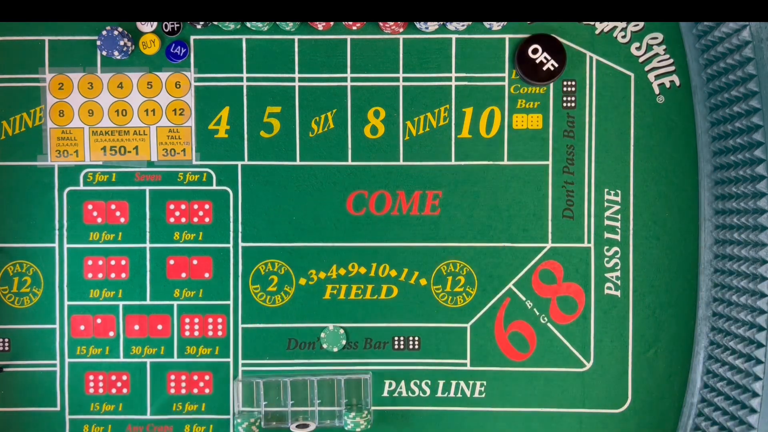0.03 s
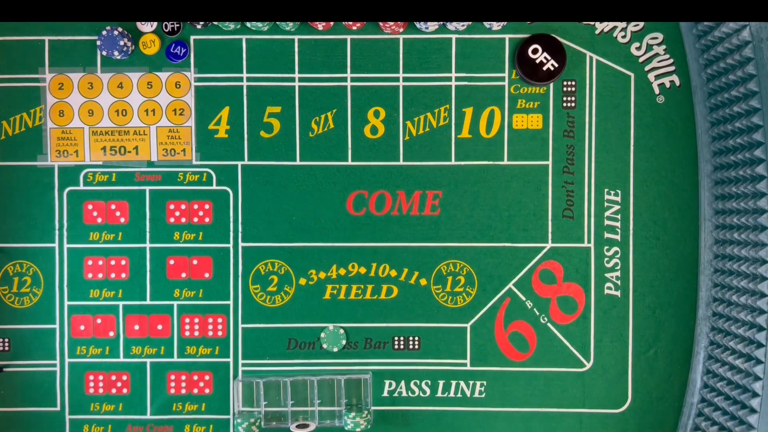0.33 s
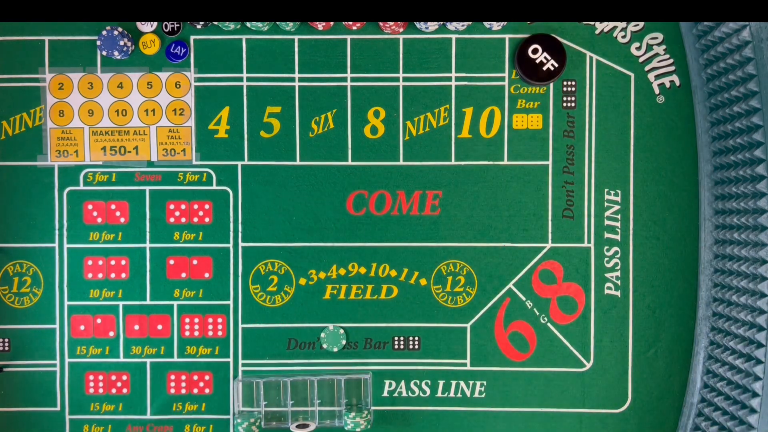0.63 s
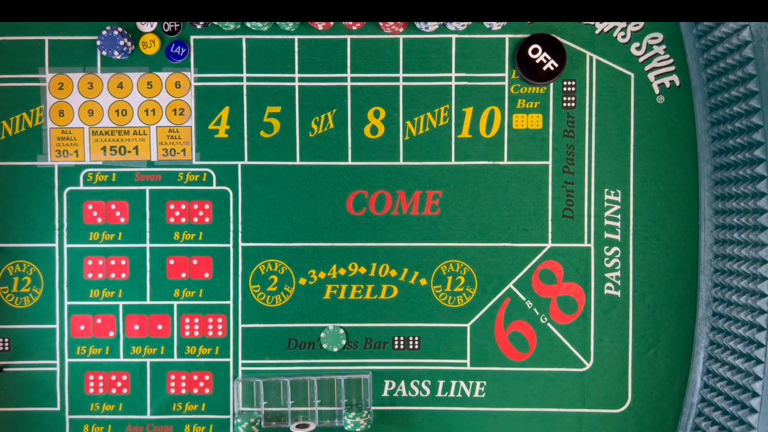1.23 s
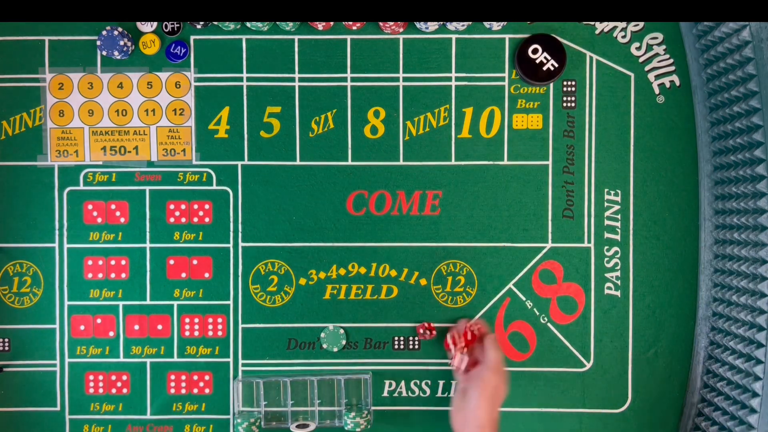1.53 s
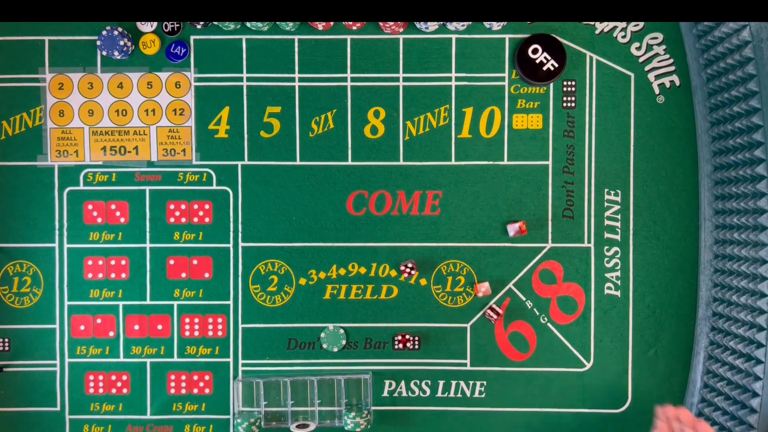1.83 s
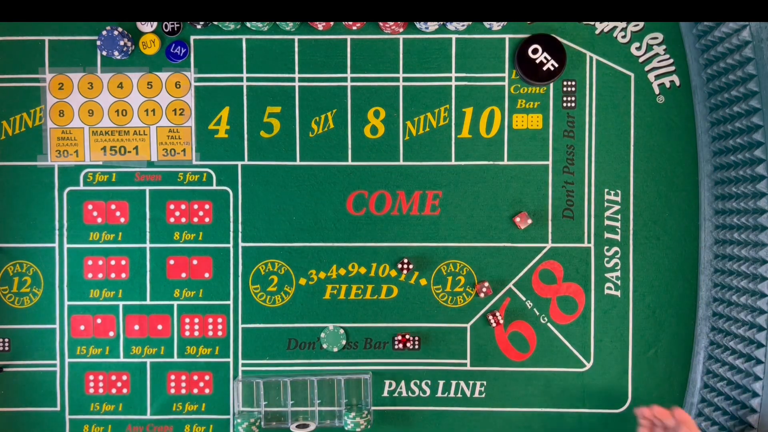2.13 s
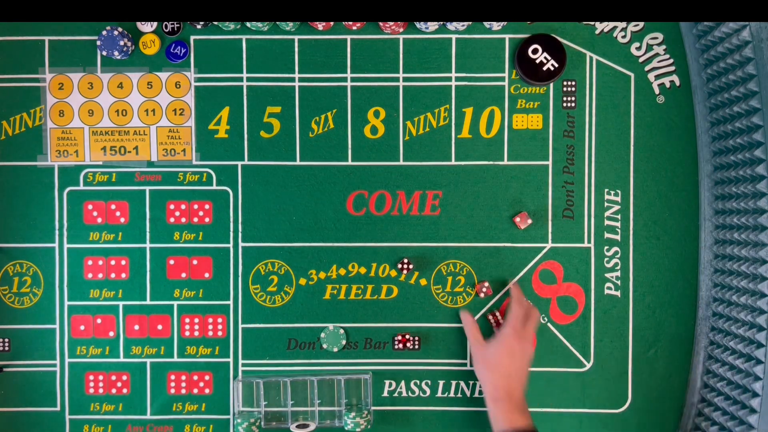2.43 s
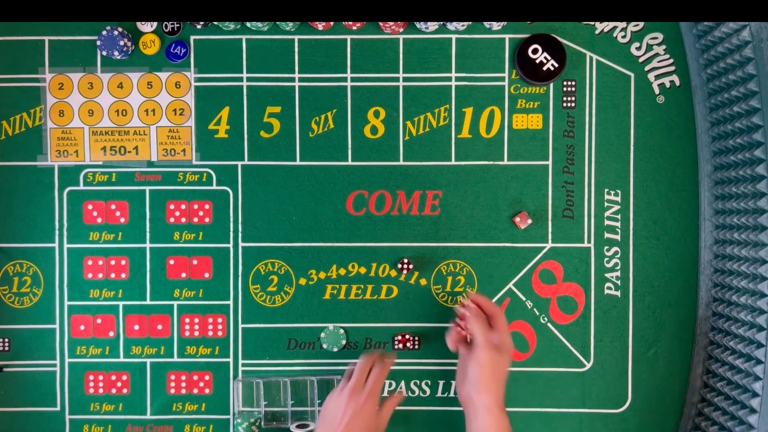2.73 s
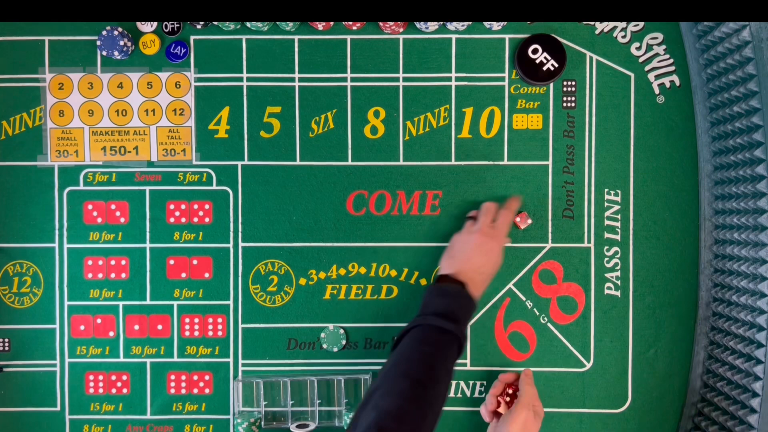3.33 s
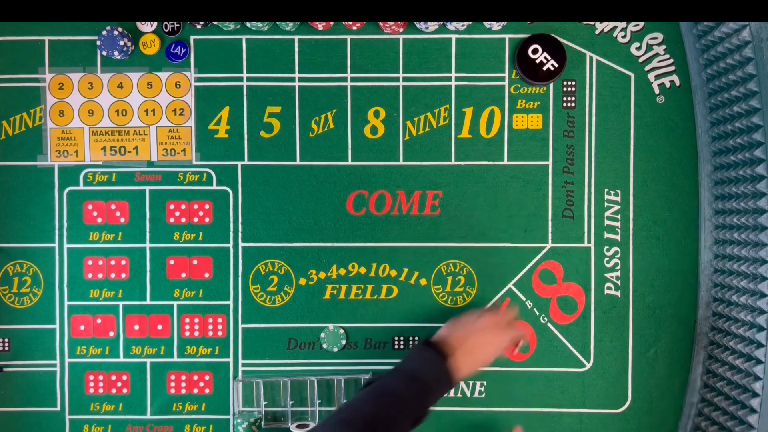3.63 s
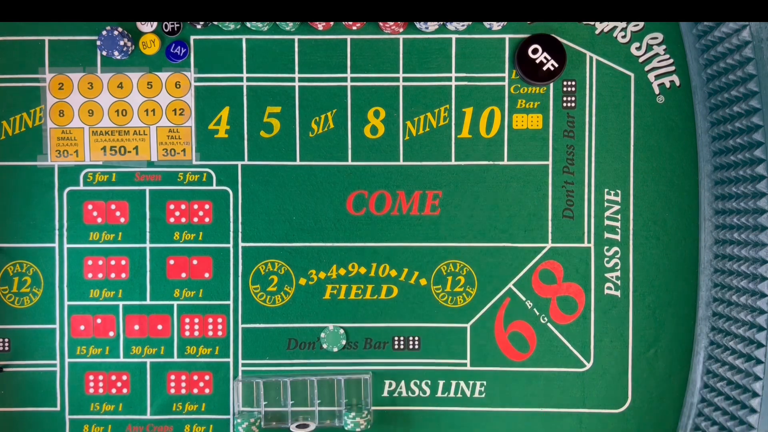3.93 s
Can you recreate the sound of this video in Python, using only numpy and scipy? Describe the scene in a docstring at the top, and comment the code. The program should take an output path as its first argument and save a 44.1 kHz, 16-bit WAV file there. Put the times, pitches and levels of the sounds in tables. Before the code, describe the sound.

Dice click together in a hand, land on a felt table and are gathered up.

```python
"""A gaming table in a small room that hums and hisses faintly.
Hard plastic dice click together in a hand, are tossed onto the felt and gathered up again.
Each click chatters, rings briefly and echoes off the table's walls. The dice land with dull
thuds that set the table top booming; a sleeve brushes the felt."""
import sys
import numpy as np
from scipy import signal
from scipy.fft import rfft, irfft
from scipy.io import wavfile

SR = 44100
rng = np.random.default_rng(int(sys.argv[2]) if len(sys.argv) > 2 else 0)


def wav_record(signal):
    """Record a signal, one row per channel, as 16-bit PCM in the file named by sys.argv[1]."""
    frames = np.transpose(np.atleast_2d(signal))
    bounded = np.clip(frames, -1, 1)
    # unit amplitude maps onto the largest positive 16-bit level
    quanta = np.round(bounded * 32767).astype(np.int16)
    wavfile.write(sys.argv[1], SR, quanta)


N = 176400


def amp(db):
    """Decibels to gain."""
    return 10 ** (np.asarray(db) / 20)


def unit_rms(x):
    return x / np.sqrt(np.mean(x ** 2) + 1e-20)


def at_hz(points, hz):
    """Interpolates a table over log frequency."""
    freqs, values = np.transpose(points)
    return np.interp(np.log(hz + 1), np.log(freqs), values)


def envelope(points):
    """A dB curve over time, as gain."""
    return amp(np.interp(np.arange(N) / SR, *np.transpose(points)))


def add(mix, start_s, sound):
    part = mix[..., max(round(start_s * SR), 0):][..., :sound.shape[-1]]
    part += sound[..., :part.shape[-1]]


def pan_left(db):
    return amp([[db], [-db]])


def sine(hz, t):
    return np.sin(2 * np.pi * hz * t)


def mode(hz, t60_s, t):
    """A struck mode dying away."""
    return sine(hz, t) * amp(-60 * t / t60_s)


def drift(limit_hz):
    """Random wander below limit_hz, rms 1."""
    passband = np.fft.rfftfreq(N, 1 / SR) < limit_hz
    return unit_rms(irfft(rfft(rng.standard_normal(N)) * passband, N))


def colour(x, spectrum, size=4096):
    """Minimum-phase filter with the given spectrum."""
    log_gain = np.log(amp(at_hz(spectrum, abs(np.fft.fftfreq(size, 1 / SR)))))
    taps = np.fft.ifft(np.exp(np.conj(signal.hilbert(log_gain)))).real[:size // 2]
    return signal.fftconvolve(np.atleast_2d(x), taps[None], axes=1)[:, :x.shape[-1]]


# Each row: frequency in Hz, left-right correlation.
STEREO_COHERENCE = [(130, 0.9), (500, 0.033)]

def noise(spectrum):
    """Stereo noise of rms 1, alike on both sides in the bass."""
    hz = np.fft.rfftfreq(N, 1 / SR)
    left, independent = rfft(rng.standard_normal((2, N)))
    coherence = np.clip(at_hz(STEREO_COHERENCE, hz), -1, 1)
    right = coherence * left + np.sqrt(1 - coherence ** 2) * independent
    return unit_rms(irfft(np.array([left, right]) * amp(at_hz(spectrum, hz)), N))


# Each row: frequency in Hz, reverberation time in seconds.
ROOM_T60 = [(3000, 0.24), (12000, 0.13)]

def room_tail(size=16384, rise_s=0.0034):
    """A fresh diffuse tail, thin in the bass and dying faster in the treble."""
    hz, t, bands = signal.stft(rng.standard_normal((2, size)), SR, nperseg=256)
    decay = amp(-60 * t / at_hz(ROOM_T60, hz)[:, None])
    bass_cut = (hz / (hz + 150))[:, None]
    tail = signal.istft(bands * decay * bass_cut, SR, nperseg=256)[1][:, :size]
    onset = np.minimum(np.arange(size) / SR / rise_s, 1)
    return unit_rms(tail * onset) / np.sqrt(size)


def in_room(sound, wet_db):
    """Direct sound plus room tail."""
    path = amp(wet_db) * room_tail()
    path[:, 0] += 1
    return signal.fftconvolve(np.atleast_2d(sound), path, axes=1)


# Each row: frequency in Hz, relative level in dB.
AIR_SPECTRUM = [(22, -46.5), (75, 4), (200, -8), (650, -6.5), (1300, -19), (10000, -55)]
HISS_SPECTRUM = [(3000, 6.5), (9300, -8), (11700, -1), (16000, -6.5)]
# Each row: time in seconds, level in dB.
HISS_LEVELS = [(1.5, -72), (2.3, -74), (2.45, -66)]
# Each row: frequency in Hz, level in dB.
HUM_PARTIALS = [(119.7, -58), (382, -70.5), (463, -69.5), (700, -74.5)]

def background(air_db=-57, waver=0.46):
    """Room noise, faint hiss and a hum that wavers in level and phase."""
    t, hum = np.arange(N) / SR, np.zeros(N)
    for hz, db in HUM_PARTIALS:
        gain = amp(db) * np.sqrt(2) * (1 + waver * drift(14))
        hum += gain * np.sin(2 * np.pi * hz * t + waver * drift(3.1))
    return amp(air_db) * noise(AIR_SPECTRUM) + envelope(HISS_LEVELS) * noise(HISS_SPECTRUM) + hum


def swish(peak_s=2.19, half_length_s=0.18, gain_db=-81, centre_hz=6270, half_width_hz=330):
    """A faint, narrow sliding swish swells and fades after the throw."""
    t = np.arange(N) / SR
    swell = np.exp(-np.square((t - peak_s) / half_length_s))
    return amp(gain_db) * swell * drift(half_width_hz) * sine(centre_hz, t)


# Each row: time in seconds, level in dB.
RUB_LEVELS = [(2.97, -58.5), (3.02, -37), (3.11, -56), (3.15, -47.5), (3.2, -62), (3.35, -98)]
# Each row: frequency in Hz, relative level in dB.
RUB_SPECTRUM = [(60, -20), (230, 5.5), (3000, -7.5), (9500, -21.5)]
FIZZ_SPECTRUM = [(6000, -14), (12500, -7)]

def sleeve(grain_db=1, fizz_db=-41, fizz_power=2.8):
    """Cloth catches and slips on the felt, and fizzes when pressed hardest."""
    t, rub = np.arange(N) / SR, envelope(RUB_LEVELS)
    touching = (t > RUB_LEVELS[0][0]) & (t < RUB_LEVELS[-1][0])
    grain = unit_rms(amp(grain_db * drift(440)))
    fizz = amp(fizz_db) * (rub / rub.max()) ** fizz_power * noise(FIZZ_SPECTRUM)
    return touching * grain * (rub * noise(RUB_SPECTRUM) + fizz)


# Each row: time in seconds, level in dB.
RUMBLE_LEVELS = [(1.4, -73), (1.8, -51), (2.4, -59.5), (2.9, -58.5), (3.35, -47.5), (4, -71)]
# Each row: frequency in Hz, relative level in dB.
RUMBLE_SPECTRUM = [(22, -31.5), (55, 7), (95, 5), (1500, -58.5)]
# Pushes that bend the top. Each row: start in seconds, level in dB, pitch in Hz.
PUSHES = [(1.543, -35, 93), (1.642, -32.5, 117.6), (2.543, -32.5, 112.7), (3.089, -36, 69),
          (3.374, -32, 93)]

def table_top(rise_s=0.005, t60_s=0.2):
    """The table top booms when pushed and rumbles under rolling dice and hands."""
    out, t = envelope(RUMBLE_LEVELS) * noise(RUMBLE_SPECTRUM), np.arange(SR) / SR
    onset = 1 - np.exp(-t / rise_s)
    for start_s, db, hz in PUSHES:
        add(out, start_s, amp(db) * mode(hz, t60_s, t) * onset)
    return out


# Each row: start in seconds, level in dB, pitch in Hz.
LANDINGS = [(1.5345, -31.5, 447), (1.546, -32, 278), (1.6338, -28, 419), (1.648, -30.5, 309),
            (1.660, -38.5, 480), (1.6744, -32, 382), (2.5405, -36, 375), (3.0608, -26, 411),
            (3.078, -25, 398), (3.093, -31, 403), (3.262, -41.5, 260)]
# Each row: frequency in Hz, relative level in dB.
PUFF_SPECTRUM = [(680, 0), (1250, -25.5), (9000, -37)]

def felt_thuds(size=4096, rise_s=0.00025, t60_s=0.043, puff_db=-9, puff_decay_s=0.0069):
    """Dice and fingers land on felt: a damped knock of the board and a soft puff."""
    out, t = np.zeros((2, N)), np.arange(size) / SR
    onset = 1 - np.exp(-t / rise_s)
    for start_s, db, hz in LANDINGS:
        soft_noise = unit_rms(colour(rng.standard_normal((2, size)), PUFF_SPECTRUM))
        puff = amp(puff_db) * soft_noise * np.exp(-t / puff_decay_s)
        thud = (mode(hz, t60_s, t) + puff) * onset
        add(out, start_s, amp(db) * in_room(thud, wet_db=-8))
    return out


# Each row: start in seconds, level per mode in dB, list of modes in Hz.
HARD_KNOCKS = [(0.999, -36.5, [2546, 6815, 7348, 7838, 8075]), (2.5425, -41, [2290, 2790, 2900])]

def dice_ring(size=8192, t60_s=0.068):
    """The hardest knocks set the dice ringing."""
    out, t = np.zeros((2, N)), np.arange(size) / SR
    for start_s, db, modes_hz in HARD_KNOCKS:
        ring = sum(mode(hz, t60_s, t) for hz in modes_hz)
        add(out, start_s, amp(db) * in_room(ring, wet_db=-7))
    return out


def wall_echoes(count=7, size=16384, decay_s=0.005):
    """A few quick echoes from the table's walls."""
    taps = np.zeros((2, size))
    for side in taps:
        delay_s = (np.arange(count) + rng.uniform(0.36, 1, count)) / count * 2 * decay_s
        side[(delay_s * SR).astype(int)] = rng.choice([-1, 1], count) * np.exp(-delay_s / decay_s)
    return unit_rms(taps) / np.sqrt(size)


# Each entry: a resonance of a die in Hz.
PLASTIC_MODES_HZ = [1480, 1794, 2300, 2800, 3257, 3538, 4045, 4450]
# Dice and cupped hand. Each row: frequency in Hz, relative gain in dB.
DICE_SPECTRUM = [(400, -32), (1050, -6.5), (2000, -2), (7500, 0), (10000, 2)]

def click(centre_hz, size=3072, chatter_db=-5, chatter_decay_s=0.00066, ring_db=-43.5, t60_s=0.073):
    """One hard contact: an impulse, brief chatter of the faces and a short plastic ring."""
    t, hz = np.arange(size) / SR, np.geomspace(100, SR / 2, 60)
    chatter = rng.standard_normal(size) * np.exp(-t / chatter_decay_s)
    ring = sum(rng.standard_normal() * mode(mode_hz, t60_s, t) for mode_hz in PLASTIC_MODES_HZ)
    hit = (t == 0) + amp(chatter_db) * chatter / np.linalg.norm(chatter) + amp(ring_db) * ring
    low_hz, high_hz = centre_hz / 1.374, centre_hz * 1.374
    lowpass = 1 / np.hypot(1, (hz / high_hz) ** 4.29)
    highpass = 1 / np.hypot(1, (low_hz / hz) ** 1.32)
    gain_db = 20 * np.log10(lowpass * highpass) + at_hz(DICE_SPECTRUM, hz)
    out = colour(hit, np.c_[hz, gain_db])
    return out / np.linalg.norm(out)


# Each row: start in seconds, length in seconds, relative level per contact in dB, centre in Hz.
PALM_RATTLES = [(.002, 0.015, -41, 2920), (1.328, 0.046, -49, 5100), (2.846, 0.026, -52, 3000),
                (3.432, .024, -41.5, 3500)]

def rattle_contacts(count=8):
    """Dice jostle in the palm: runs of light, unevenly spaced contacts."""
    return [(start_s + length_s * (k + jitter) / count, db, hz)
            for start_s, length_s, db, hz in PALM_RATTLES
            for k, jitter in enumerate(rng.random(count))]


# Sharper contacts reach higher. Each row: start in seconds, relative level in dB, centre in Hz.
DIE_CONTACTS = [(.0005, -26.5, 3030), (0.0557, -24.5, 2300), (0.0572, -23, 4400), (0.0603, -29, 2770),
                (.0853, -45, 3570), (0.2095, -40, 2150), (0.2545, -34, 2100), (0.276, -41, 2800),
                (0.3049, -43, 2820), (0.356, -33, 3170), (.502, -45, 2500), (.5385, -32, 2730),
                (.571, -36, 2540), (.843, -42.5, 3330), (0.9562, -38, 3600), (0.9805, -37, 2420),
                (.995, -26.5, 7000), (.9992, -27, 7500), (1.003, -27.5, 6500), (1.069, -33.5, 2520),
                (1.273, -39.5, 5260), (1.2771, -29, 4800), (1.3215, -36, 4440), (1.4379, -28.5, 4100),
                (1.4518, -33, 5200), (1.462, -33.5, 6260), (1.5212, -32, 2800), (1.5434, -39, 3580),
                (1.57, -32, 4700), (1.5732, -39.5, 4500), (2.4975, -39, 3920), (2.500, -29.5, 3140),
                (2.526, -46, 2800), (2.5385, -34, 2600), (2.5425, -27, 3900), (2.545, -47, 2880),
                (2.7775, -53, 3250), (2.9056, -32.5, 4260), (3.3825, -42.5, 3020), (3.4175, -44, 3170),
                (3.4238, -39.5, 3100), (3.449, -39.5, 3530), (3.4527, -36, 3730), (3.54, -47, 1450)]
# Drier once the dice are over the table. Each row: time in seconds, room send in dB.
ROOM_SEND = [(.2, 2), (1.0, -3), (2.5, -6)]

def dice_clicks(gain_db=16.5, walls_db=-3, snap_hz=7000, max_stereo_delay_s=0.00054):
    """Die hits die: each click arrives directly with a crisp snap, off the walls and via the room."""
    out, snap_lowpass = np.zeros((2, N)), signal.butter(1, snap_hz, fs=SR)
    for start_s, db, hz in DIE_CONTACTS + rattle_contacts():
        walls = amp(walls_db) * wall_echoes()
        direct = np.zeros_like(walls)
        right_lag = int(rng.random() * max_stereo_delay_s * SR)
        direct[0, 0] = direct[1, right_lag] = 1
        tail = amp(np.interp(start_s, *np.transpose(ROOM_SEND))) * room_tail()
        path = (direct + walls) * pan_left(db=1) + tail * pan_left(db=2.5)
        snap_db = -5 + 0.31 * db  # harder contacts are crisper
        snap = amp(snap_db) * signal.lfilter(*snap_lowpass, np.diff(direct, prepend=0))
        add(out, start_s, amp(db + gain_db) * signal.fftconvolve(click(hz), path, axes=1))
        add(out, start_s, amp(db + gain_db) * snap)
    return out


def scene():
    return dice_clicks() + dice_ring() + felt_thuds() + table_top() + sleeve() + swish() + background()


# Each row: frequency in Hz, gain in dB.
TREBLE_NOTCH = [(8800, -1), (10100, -32), (11400, -2.5)]

def record(dry, cutoff_hz=15450):
    """A deep, narrow dip in the treble near 10 kHz, then the band limit."""
    lowpass = signal.firwin(511, cutoff_hz, window=("kaiser", 9), fs=SR)
    return signal.oaconvolve(colour(dry, TREBLE_NOTCH), lowpass[None], "same")


dry = scene()
out = record(dry)
wav_record(out)
```